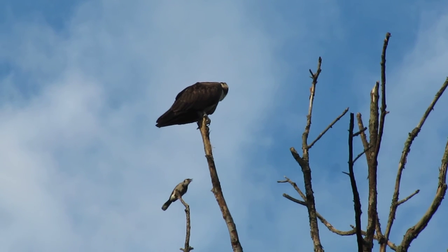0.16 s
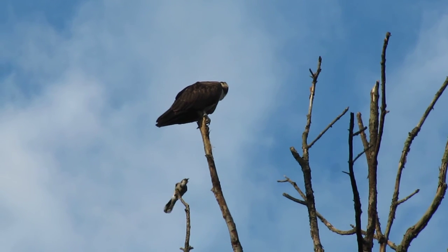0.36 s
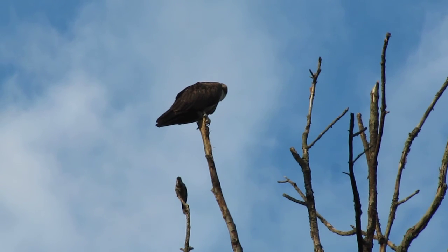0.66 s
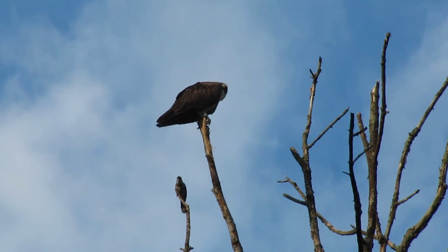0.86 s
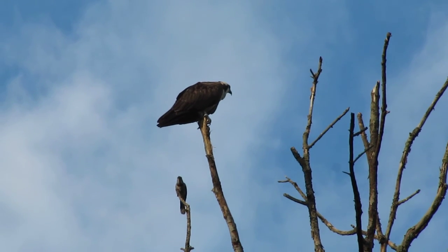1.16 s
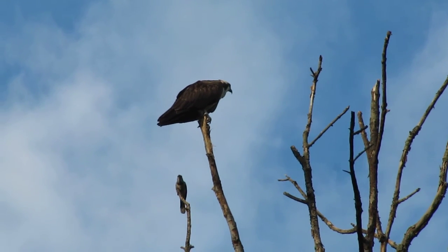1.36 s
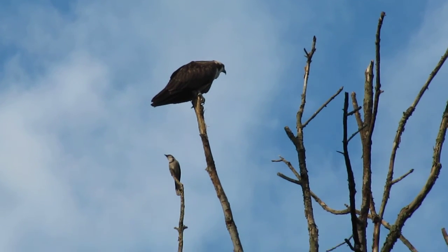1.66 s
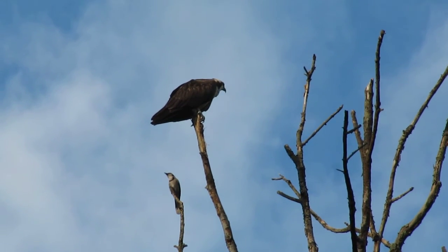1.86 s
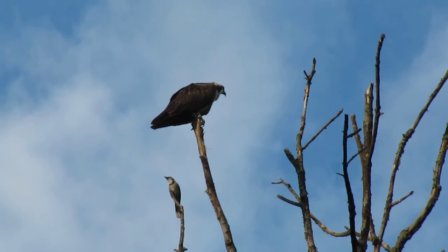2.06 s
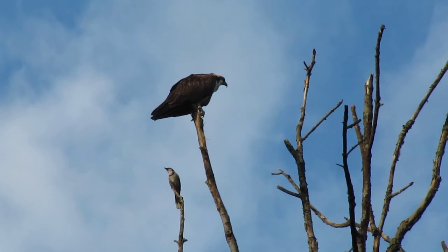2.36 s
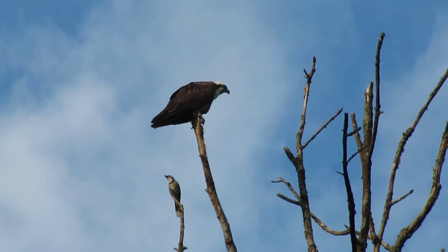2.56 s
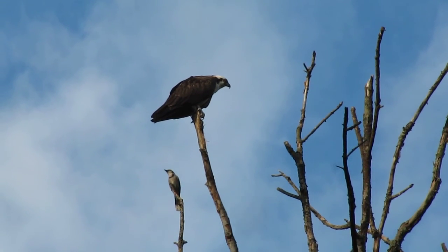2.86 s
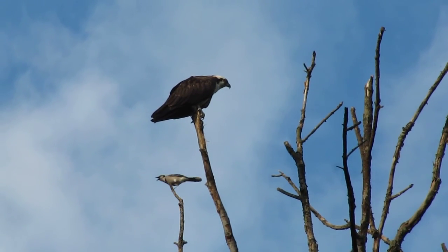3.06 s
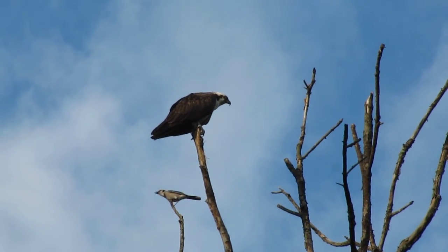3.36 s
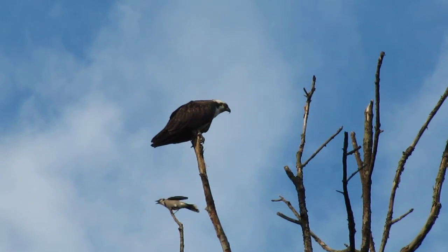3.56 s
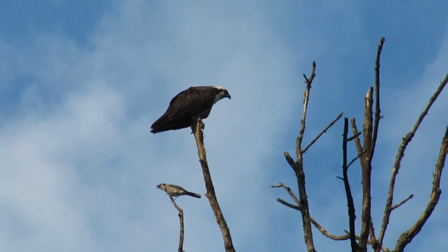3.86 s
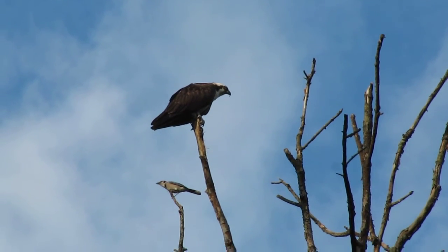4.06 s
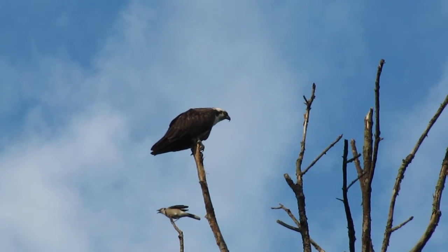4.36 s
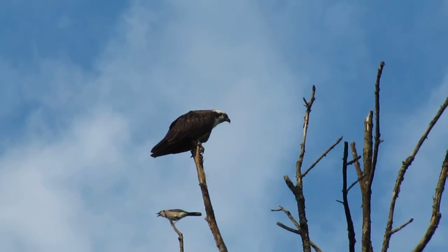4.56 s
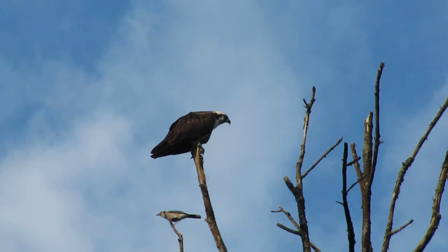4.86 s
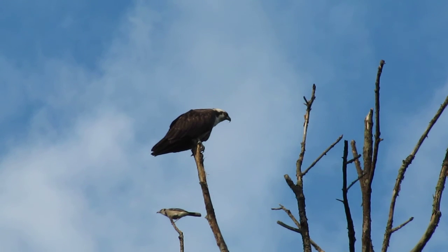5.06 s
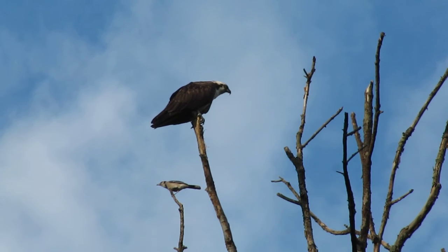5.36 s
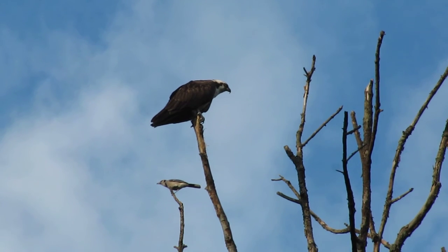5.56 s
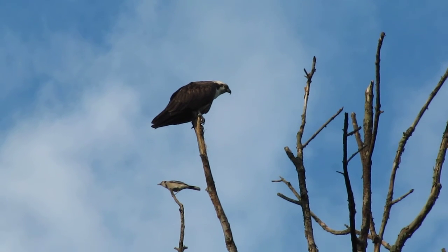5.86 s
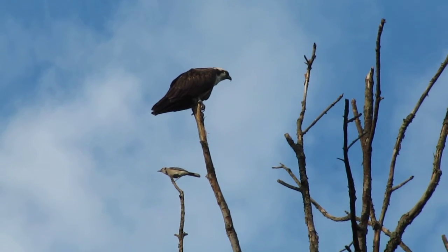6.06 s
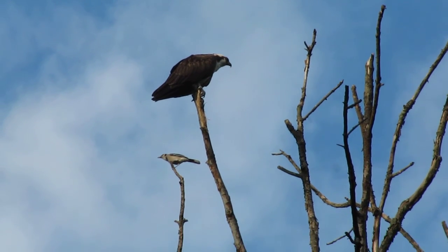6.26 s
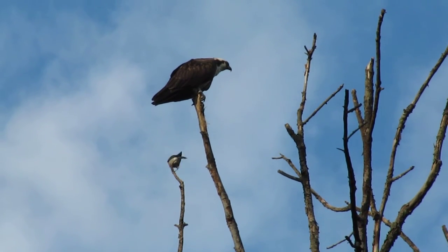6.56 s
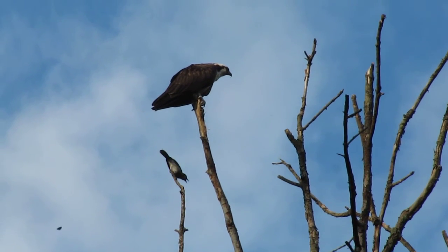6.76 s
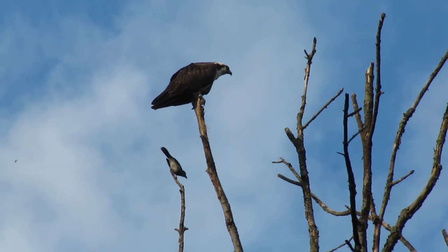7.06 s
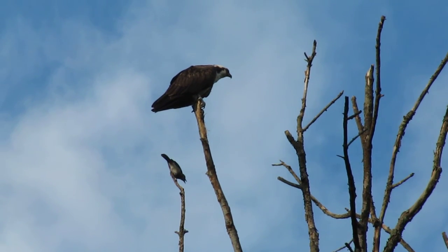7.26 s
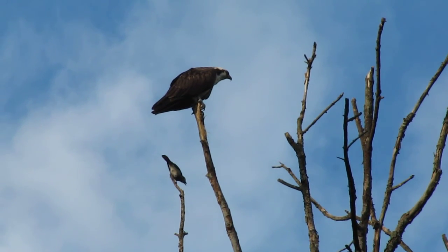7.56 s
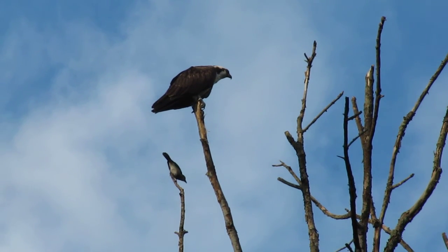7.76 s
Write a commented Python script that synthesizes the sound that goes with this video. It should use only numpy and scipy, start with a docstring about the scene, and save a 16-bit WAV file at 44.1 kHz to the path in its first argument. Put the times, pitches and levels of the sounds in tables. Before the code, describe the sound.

Bursts of raspy jeers from a close jay and a more distant one ring through the trees, with a few faint ticks between.

```python
"""Blue jays scolding in a wood

Two blue jays, one near and one farther off, scold a large bird perched on a dead tree. Each 'jeer'
leaps up in pitch, sags, and breaks from a reedy tone into a rasp; the trees scatter it back. Under them
are a low rumble and hum, a thin insect tone, a few dry ticks close by, and faint sounds: a brief
scratchy rustle, a high hiss, distant bird chirps and low tones."""
import sys
import numpy as np
from scipy import signal
from scipy.fft import rfft, irfft, next_fast_len
from scipy.io import wavfile

SR = 44100
rng = np.random.default_rng(int(sys.argv[2]) if len(sys.argv) > 2 else 0)


def transcribe(signal):
    """Save signal, clipped to [-1, 1], as a 16-bit WAV file at the path in sys.argv[1]."""
    frames = np.atleast_2d(signal).T
    limited = np.clip(frames, -1, 1)
    pcm = np.round(limited * 32767).astype(np.int16)
    wavfile.write(sys.argv[1], SR, pcm)


N = 348390
TIME = np.arange(N) / SR

# How a jay's throat and open beak boost or weaken each frequency: (frequency [Hz], gain [dB])
THROAT = [(1200, -31.5), (2000, -28.5), (2450, -2), (2750, -10), (3150, -3), (3500, -1), (4050, 5),
          (4500, -6.5), (5500, -6.5), (6500, -3.5), (7400, -10.5), (8900, -4), (10300, -20.5), (13000, -28),
          (15500, -42)]


def from_db(db):
    """Turn decibels into a factor to multiply by."""
    return 10 ** (np.asarray(db) / 20)


def rms_one(x):
    """Scale a sound so that its average strength (rms) is 1."""
    return x / np.sqrt(np.mean(x ** 2) + 1e-20)


def at_hz(points, hz):
    """Read between the rows of a (frequency, value) table, with octaves evenly spaced."""
    known_hz, values = np.transpose(points)
    return np.interp(np.log(np.maximum(hz, 1)), np.log(known_hz), values)


def noise(spectrum, size):
    """Noise of strength 1, coloured by a (frequency, level) table."""
    gain = from_db(at_hz(spectrum, np.fft.rfftfreq(size, 1 / SR)))
    return rms_one(irfft(rfft(rng.standard_normal(size)) * gain, size))


def drift(rate, size):
    """A random wobble of strength about 1 that turns `rate` times a second."""
    steps = np.arange(size) * rate / SR
    targets = rng.standard_normal(2048)
    return np.sqrt(3 / 2) * np.interp(steps, np.arange(len(targets)), targets)


def resonate(x, hz, width_hz):
    """Let a sound ring in one narrow band of frequencies."""
    r = np.exp(-np.pi * width_hz / SR)
    feedback = [1, -2 * r * np.cos(2 * np.pi * hz / SR), r * r]
    return signal.lfilter([(1 - r * r) / 2, 0, (r * r - 1) / 2], feedback, x)


def narrow_noise(hz, width_hz):
    """Noise in one band: a wavering tone if the band is narrow, a hiss if it is wide."""
    once = resonate(rng.standard_normal(N), hz, width_hz)
    return rms_one(resonate(once, hz, width_hz))


def highpass(order, hz):
    """Design a filter that weakens everything below `hz`."""
    return signal.butter(order, hz, "high", fs=SR, output="sos")


def add(out, start_s, sound):
    """Mix a sound in from the given time; it may be under way already."""
    i = round(start_s * SR)
    sound, i = sound[max(-i, 0):], max(i, 0)
    out[i:i + len(sound)] += sound[:max(N - i, 0)]


def call_shape(age, length_s, crest_s, top_hz, sag_hz_per_s):
    """Pitch and loudness of a call: both rise at first, sink steadily, then droop at the very end."""
    climb_hz_per_s, fade_db_per_s, swell_s = 480, 19, .012
    before = np.maximum(crest_s - age, 0)
    after = np.maximum(np.minimum(age, length_s) - crest_s, 0)
    droop = np.exp(np.minimum(age - length_s, 0) / .0348)
    pitch_hz = top_hz - climb_hz_per_s * before - sag_hz_per_s * after - 78.1 * droop
    loudness_db = -20.5 * np.exp(-age / swell_s) - fade_db_per_s * after - 6.5 * droop
    return pitch_hz, loudness_db


def reedy_tone(half_hz, phase, partials, doubled, half_db, quarter_db, waver_db):
    """A bird's voice box repeats only every second or fourth swing, adding tones between its harmonics."""
    size = len(phase)
    second_harmonic_db = at_hz(THROAT, 4 * half_hz)

    def partial(multiple, db):
        """One pure tone, coloured by the throat as it glides."""
        gain = from_db(db + at_hz(THROAT, multiple * half_hz) - second_harmonic_db)
        return gain * np.sin(multiple * phase + 2 * np.pi * rng.random())

    tone = np.zeros(size)
    for multiple, db in partials:
        if multiple % 2:   # halfway tones come and go
            tone += doubled * partial(multiple, db + half_db + waver_db * drift(14.2, size))
        else:   # harmonics: only the upper ones waver
            tone += partial(multiple, db + (multiple > 4) * 2.5 * drift(12.5, size))
    for multiple in range(3, 12):   # quarter-way tones
        tone += doubled * partial(multiple + .5, quarter_db + waver_db * drift(30.7, size))
    return np.sqrt(2) * tone


def jeer(call, partials, jitter, hoarse_jitter, clear_shake, clear_rasp_db, break_s,
         waver_db, doubling_s, flutter, attack_s, release_s):
    """One call: thin skins in the voice box swing with a reedy tone, then turn chaotic and hoarse."""
    (length_s, crest_s, top_hz, sag_hz_per_s, level_db, leap_octaves, leap_s,
     hoarse_s, rasp_db, half_db, quarter_db, beak_db) = call
    size = next_fast_len(SR // 2)
    age = np.arange(size) / SR
    pitch_hz, loudness_db = call_shape(age, length_s, crest_s, top_hz, sag_hz_per_s)
    hoarse = .5 + .5 * np.tanh((age - length_s + hoarse_s) / break_s)   # 0 clear, 1 hoarse
    doubled = 1 - np.exp(-(age / doubling_s) ** 2)   # the in-between tones build up
    # the skins tighten at the start, so the pitch leaps up; chaos shakes their timing more and more
    pitch_hz *= 2 ** (-leap_octaves * np.exp(-age / leap_s))
    pitch_hz *= 1 + (jitter + hoarse_jitter * hoarse) * drift(349.8, size) + .00289 * drift(25.05, size)
    half_hz = pitch_hz / 4   # from the second harmonic down to half the base pitch
    shake_radians = (clear_shake + .052 * hoarse) * drift(1100, size)
    phase = 2 * np.pi * np.cumsum(half_hz) / SR + shake_radians
    tone = reedy_tone(half_hz, phase, partials, doubled, half_db, quarter_db, waver_db)
    tone *= 1 + flutter * hoarse * np.tanh(drift(450, size))
    # a puff of air noise gets through once a swing; it grows as the voice breaks
    rasp = noise(THROAT, size) * (1 + .5 * np.cos(2 * phase))
    rasp = signal.sosfilt(highpass(4, 2300), rasp)
    rasp_gain = from_db(clear_rasp_db) + hoarse * from_db(rasp_db) + .122 * (1 - doubled)
    voice = (tone + rasp_gain * rasp) / np.sqrt(1 + rasp_gain ** 2)
    # a wider beak lets out more treble
    voice += (from_db(beak_db) - 1) * signal.sosfiltfilt(highpass(3, 5000), voice)
    # the voice stays between 1.5 and 13.5 kHz; the air takes away the very top
    voice = signal.sosfilt(signal.butter(3, [1500, 13500], "band", fs=SR, output="sos"), voice)
    gate = np.minimum(age / attack_s, 1) * np.exp(-np.maximum(age - length_s, 0) / release_s)
    return voice * gate * from_db(level_db + loudness_db)


def jay(calls, **voice):
    """All the calls of one bird, each at its own time."""
    out = np.zeros(N)
    for start_s, *call in calls:
        add(out, start_s, jeer(call, **voice))
    return out


def near_jay():
    """The near bird: loud calls that start with a big leap in pitch and stop sharply."""
    # One jeer a row; pitch is that of the strong second harmonic: (start [s], length [s],
    # time to top pitch [s], top pitch [Hz], sag [Hz/s], relative level [dB], leap [octaves],
    # leap time [s], hoarse ending [s], rasp [dB], halfway tones [dB], quarter-way tones [dB], treble [dB])
    calls = [ (-0.14, .355, .09, 3412, 1042, -20, 0.46, 0.0056, .1, -4, -2.5, -29, -2),
             (0.445, 0.34, 0.079, 3555, 1471, -19.5, .25, .01, 0.062, 0.5, -4.5, -25, 1),
             (3.053, 0.39, 0.071, 3443, 1153, -23, 0.57, 0.0052, .1, -5, -4.5, -25, 0.5),
             (3.656, 0.38, 0.048, 3514, 1178, -22, 0.52, 0.0074, 0.091, 0, -3, -48, 0),
             (4.464, 0.37, .08, 3506, 1504, -22.5, .44, 0.0069, 0.072, 0.5, -4, -26.5, 0.5),
             (6.665, 0.41, 0.081, 3433, 1155, -23, 0.53, 0.0053, 0.12, -0.5, -2, -38, -3),
             (7.333, .35, .05, 3469, 1045, -21.5, 0.81, 0.004, 0.096, -0.5, -2, -22, -4)]
    # Tones in the voice; odd ones lie halfway between harmonics:
    # (frequency [multiples of half the base pitch], relative level [dB])
    partials = [(2, 1.5), (3, -19.5), (4, 1), (5, -15), (6, -8.5), (7, -16), (8, -6), (9, -6), (10, -8.5),
                (11, -11), (12, -9.5), (13, -9.5), (14, -5.5), (15, -10), (16, -7), (17, -6)]
    return jay(calls, partials=partials, jitter=.0038, hoarse_jitter=.0062, clear_shake=.011,
               clear_rasp_db=-25, break_s=.022, waver_db=2, doubling_s=.026, flutter=.85,
               attack_s=.0019, release_s=.0036)


def wood(x, trunks_db, trunks_s, tail_db, dullness):
    """Add echoes: nearby trunks give separate ones, and the trees beyond give a long, smooth tail."""
    # How long the wood takes to fade by 60 dB: (frequency [Hz], time [s])
    ring_times = [(1000, 1.76), (3200, 1.01), (6500, 1.08), (10000, 0.76), (15000, 0.16)]
    t, echoes_per_s = TIME[:SR], 500
    trunks = rng.standard_normal(SR) * (rng.random(SR) < echoes_per_s / SR)
    trunks *= np.exp(-t / trunks_s) * (t > .006)
    trunks = signal.lfilter([1 - dullness], [1, -dullness], trunks / np.sqrt(np.sum(trunks ** 2)))
    hz, frame_s, scatter = signal.stft(rng.standard_normal(SR), SR, nperseg=256)
    scatter *= from_db(-60 * frame_s / at_hz(ring_times, hz)[:, None])
    tail = signal.lfilter([1], [1, -dullness], signal.istft(scatter, SR)[1][:SR])
    tail *= 1 - np.exp(-t / .028)
    echoes = from_db(trunks_db) * trunks + from_db(tail_db) * tail / np.sqrt(np.sum(tail ** 2))
    return x + signal.fftconvolve(x, echoes)[:N]


def rumble():
    """Steady distant rumble with a little hiss on top."""
    # Colour of the outdoor air: (frequency [Hz], relative level [dB])
    colour = [(15, -36), (25, -2), (113, -2), (133, -6.5), (169, -2.5), (389, -11.5), (434, -13),
              (496, -12.5), (685, -16.5), (1340, -20.5), (2430, -25.5), (6580, -32.5), (9080, -31.5),
              (11300, -39), (15600, -42)]
    return from_db(-49.26) * noise(colour, N)


def hum():
    """A faint low hum that swells and fades."""
    # How loud the hum is: (time [s], relative level [dB])
    levels = [(0.0, -65), (1.06, -67), (3.21, -56.5), (5.35, -65), (5.96, -58), (6.09, -69.5), (6.49, -58),
              (7.9, -71)]
    level_db = np.interp(TIME, *np.transpose(levels)) + 1.5
    return from_db(level_db) * narrow_noise(hz=109, width_hz=14)


def insect():
    """A thin, high insect tone that never stops."""
    return from_db(-76.5) * narrow_noise(hz=7820, width_hz=350)


def far_jay():
    """The farther bird: quieter calls with a small leap and softer edges."""
    # Its jeers and the tones in its voice, with the same columns as in near_jay
    calls = [ (0.17, 0.29, 0.044, 3237, 1283, -36, 0.057, .01, .1, -3, 5.5, -14, -8.5),
             (0.79, .25, 0.055, 3300, 1240, -40.5, 0.048, 0.0101, 0.13, -8, 7, -22, -4),
             (4.12, .28, 0.076, 3410, 1507, -28.5, 0.066, 0.0093, 0.038, -2, -5.5, -25, -0.5),
             (4.915, 0.27, .07, 3445, 2104, -32, 0.0755, 0.0098, 0.066, -26, -1, -21, -2),
             (7.68, 0.25, 0.064, 3295, 608, -34.5, 0.049, .01, 0.2, -15, -3.5, -14, -0.5)]
    partials = [(2, 3), (3, -15), (4, 1), (5, -24), (6, -9.5), (7, -33), (8, -12.5), (9, -11), (10, -10.5),
                (11, -10), (12, -4.5), (13, -8), (14, -8)]
    return jay(calls, partials=partials, jitter=.0036, hoarse_jitter=.0047, clear_shake=.048,
               clear_rasp_db=-22.5, break_s=.031, waver_db=4, doubling_s=.022, flutter=.46,
               attack_s=.008, release_s=.022)


def faint_sounds():
    """A brief scratchy rustle before a tick, a high hiss, distant bird chirps and faint low tones."""
    # Noise bands that fade in and out: (middle [s], length [s], pitch [Hz], width [Hz], level [dB])
    bands = [(1.36, 0.055, 10100, 4500, -58.5), (1.702, 0.21, 8450, 2000, -60),
             (2.368, .14, 4040, 710, -67), (2.41, .18, 3330, 400, -63), (2.672, 0.67, 4400, 1220, -67),
             (2.37, .14, 4430, 90.5, -68), (2.62, .2, 5220, 90, -70), (0.779, 0.5, 940, 61.8, -60),
             (1.297, 1.24, 476, 47, -63.5), (1.512, 0.76, 295, 40.6, -57.5), (3.304, 0.91, 496, 30, -63)]
    out = np.zeros(N)
    for middle_s, length_s, hz, width_hz, db in bands:
        swell = np.exp(-(2 * (TIME - middle_s) / length_s) ** 2)
        out += from_db(db) * swell * narrow_noise(hz, width_hz)
    return out


def ticks(ring_db, ring_width_hz, level_db, scuff_db, scuff_s):
    """Each dry tick is a faint scuff that builds up, then a brief crack with a short ring."""
    # One tick a row: (time [s], relative peak [dB], ring pitch [Hz], fade time [s], treble [dB])
    cracks = [(1.194, -31, 2690, 0.0051, -18), (1.212, -20.5, 2480, 0.00085, 1),
              (1.395, -24.5, 473, 0.0011, 7), (1.534, -27.5, 880, 0.0067, -18),
              (1.609, -21, 3900, 0.00054, 4), (1.618, -33.5, 4040, 0.0042, 0),
              (1.907, -22, 655, 0.0014, -8.5), (5.205, -20.5, 3170, 0.00048, 13),
              (5.732, -31, 2310, 0.0023, 1)]
    # Colour of a crack: (frequency [Hz], relative level [dB])
    colour = [(200, -5.5), (700, -2.5), (2500, -0.5), (4200, -5), (6000, -6), (8000, -1.5), (11000, -8),
              (15500, -21)]
    out, lead_s = np.zeros(N), .08
    t = TIME[:8192] - lead_s
    for time_s, db, ring_hz, decay_s, treble_db in cracks:
        snap = np.exp(-np.abs(t) / np.where(t < 0, .0004, decay_s))
        scuff = from_db(scuff_db) * np.exp(-np.abs(t) / scuff_s)
        crack = noise(colour, len(t)) * (snap + scuff)
        treble = signal.sosfilt(highpass(1, 5000), crack)
        ring = from_db(ring_db) * resonate(crack, ring_hz, ring_width_hz)
        tick = crack + (from_db(treble_db) - 1) * treble + ring
        add(out, time_s - lead_s, from_db(db + level_db) * tick / np.abs(tick).max())
    return out


def scene():
    """Mix the echoing jays, the ticks and the background into one channel."""
    near, far = near_jay(), far_jay()
    near = from_db(-1.56) * wood(near, trunks_db=-3, trunks_s=.025, tail_db=-13, dullness=.052)
    far = from_db(-4.5) * wood(far, trunks_db=-2.5, trunks_s=.03, tail_db=-7.5, dullness=.1)
    close = ticks(ring_db=14.5, ring_width_hz=140, level_db=-4, scuff_db=-28, scuff_s=.038)
    background = rumble() + hum() + insect() + faint_sounds()
    return (near + far + close + background)[None]


def record(dry):
    """Cut off the very highest treble steeply."""
    cutoff_hz = 15750
    return signal.sosfilt(signal.ellip(10, .1, 80, cutoff_hz, fs=SR, output="sos"), dry)


dry = scene()
out = record(dry)
transcribe(out)
```